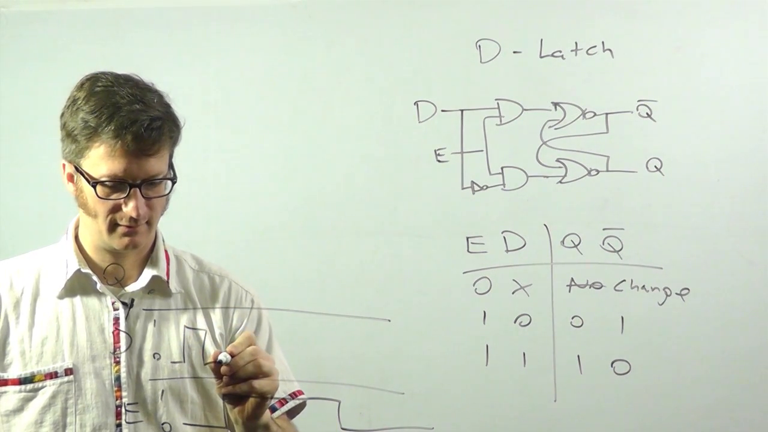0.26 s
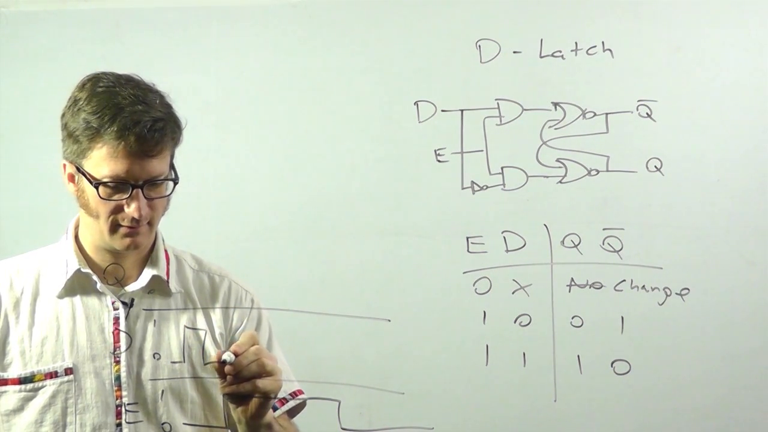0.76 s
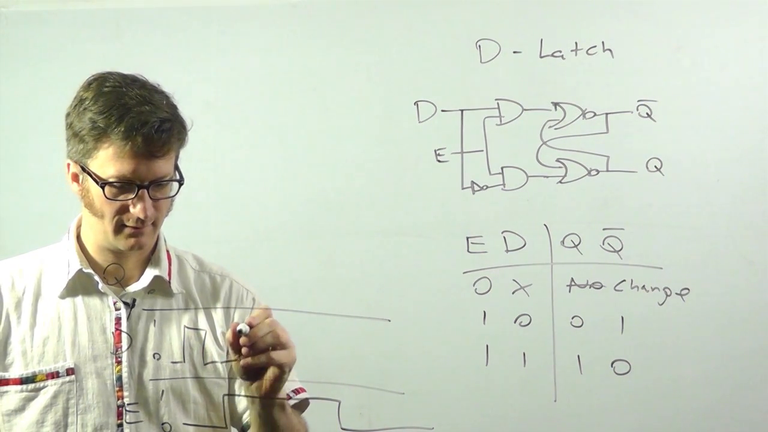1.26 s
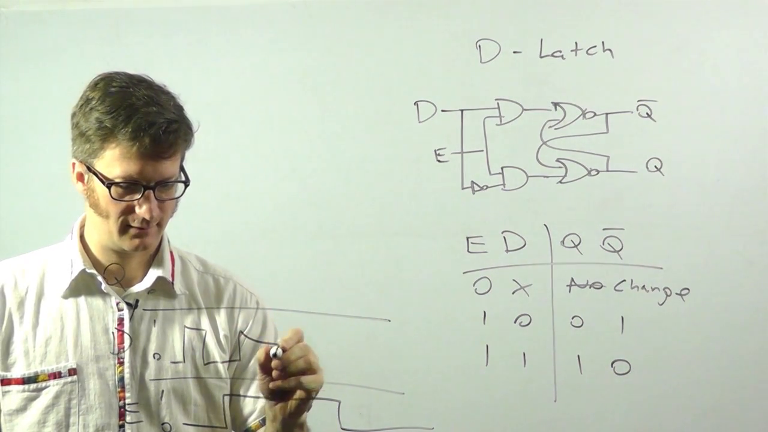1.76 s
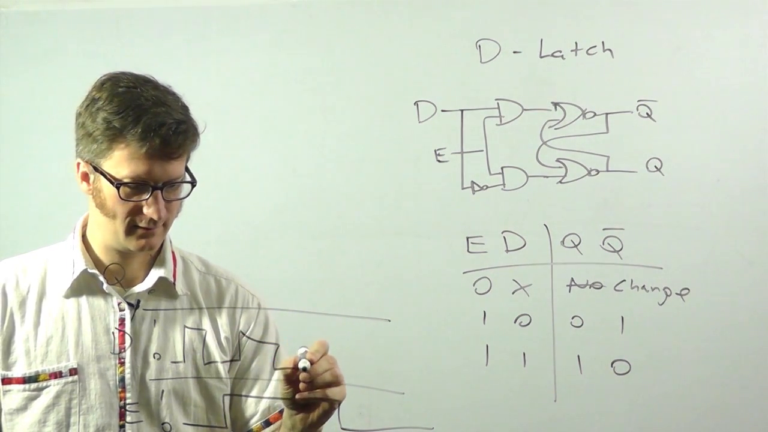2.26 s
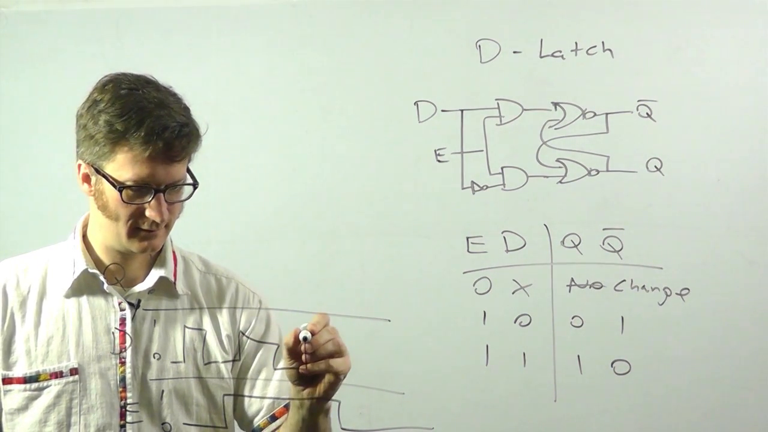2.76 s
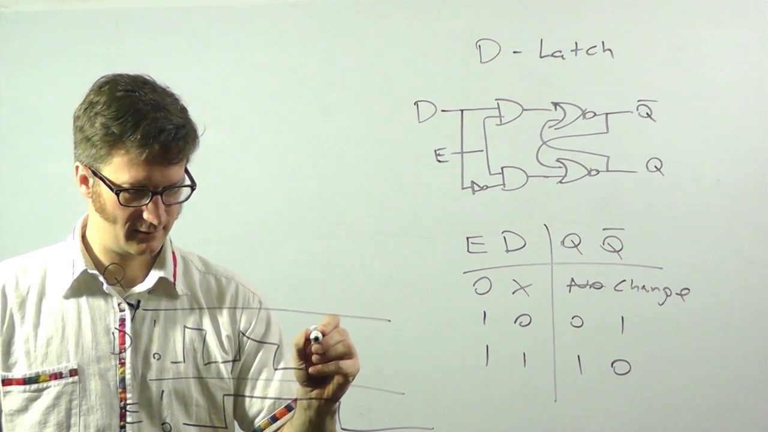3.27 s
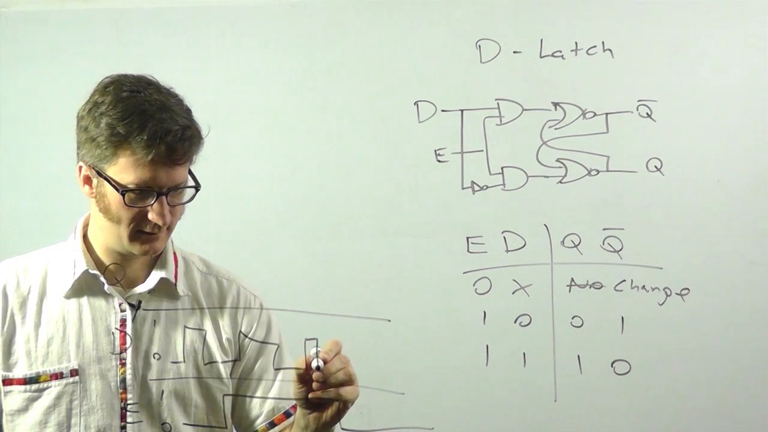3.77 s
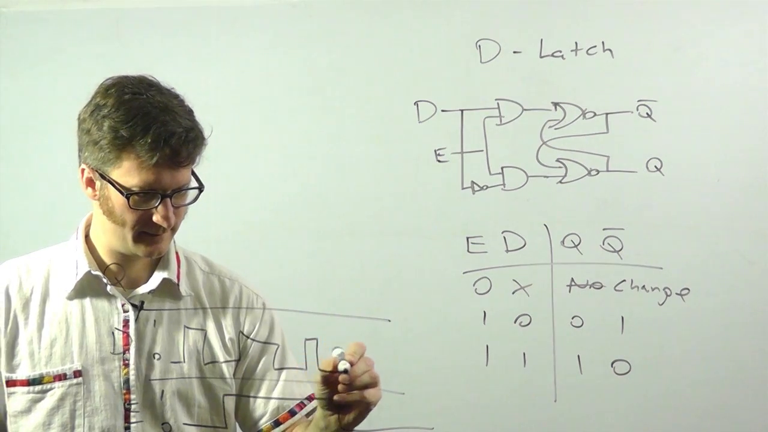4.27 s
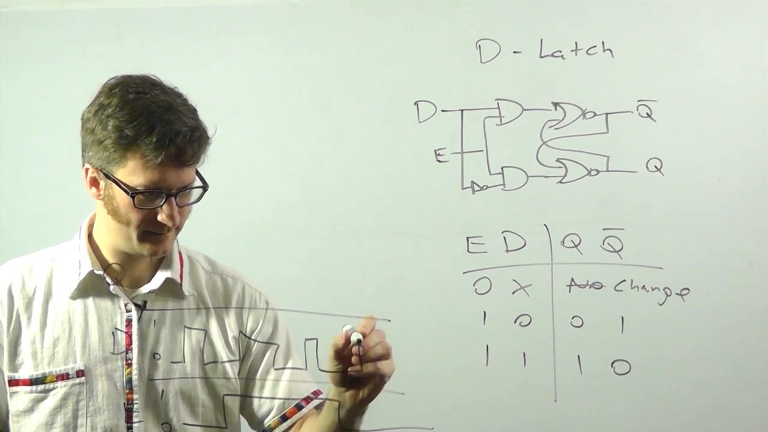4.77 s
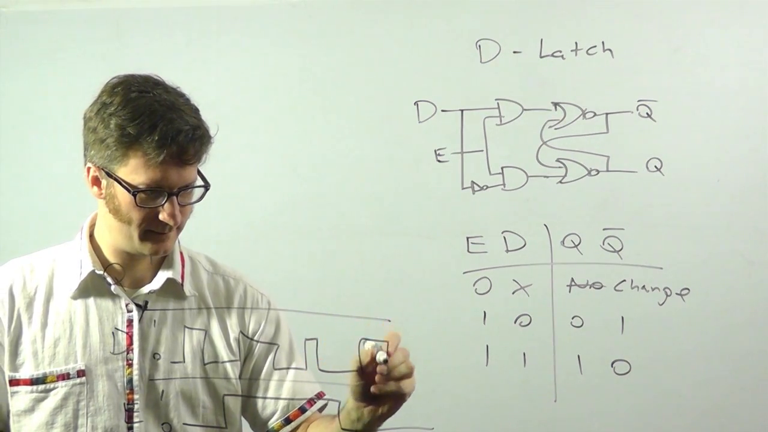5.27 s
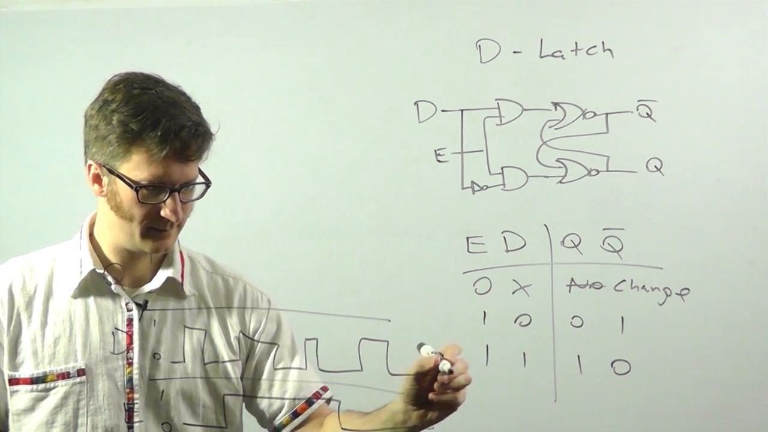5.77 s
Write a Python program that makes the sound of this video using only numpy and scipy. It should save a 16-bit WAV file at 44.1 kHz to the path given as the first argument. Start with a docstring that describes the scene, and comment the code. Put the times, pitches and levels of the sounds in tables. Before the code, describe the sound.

A felt-tip marker squeaks and chirps in short irregular strokes on a smooth hard board, with faint hiss between, in a quiet small room.

```python
"""A felt marker squeaks as it draws a square wave on a glass board: at the corners its tip sticks and slips.
Slow slips are pulses that ring the modes of the pen (chatter); fast ones are gliding tones (whistles).
Snaps of noise mark the stuck tip breaking loose, scraping noise follows the squeaks, and the runs hiss faintly.
Underneath are shaped noise for rumble and microphone hiss, and a low hum; a sleeve rustles as the arm drops.
Decaying noise tails add the echoes of the board and the room."""
import sys
import numpy as np
from scipy import signal
from scipy.fft import rfft, irfft, next_fast_len
from scipy.io import wavfile
from scipy.ndimage import uniform_filter1d

SR = 44100
rng = np.random.default_rng(int(sys.argv[2]) if len(sys.argv) > 2 else 0)


def output_pcm(signal):
    """Save a mono or channel-first signal as 16-bit PCM at the path in sys.argv[1].

    Samples are clipped to [-1, 1] before scaling.
    """
    pcm = np.clip(np.atleast_2d(signal).T, -1, 1) * 32767
    wavfile.write(sys.argv[1], SR, np.round(pcm).astype(np.int16))


N = 264732  # length in samples


def amp(db):
    """Turn dB into a gain."""
    return 10 ** (np.asarray(db) / 20)


def unit(x):
    """Scale x to an rms of 1."""
    return x / np.sqrt(np.mean(x ** 2) + 1e-20)


def along(points, hz):
    """Read a curve of (f/Hz, value) points on a log frequency axis."""
    f, v = np.transpose(points)
    return np.interp(np.log(hz + 1), np.log(f + 1), v)


def track(rows, left=None):
    """Read every column of a time table at each sample of the scene."""
    s, *cols = np.transpose(rows)
    return [np.interp(np.arange(N) / SR, s, c, left=left) for c in cols]


def filtered(x, response):
    """Filter x by a frequency response, with silence added so the ringing does not wrap around."""
    m = next_fast_len(N + SR // 2)
    return irfft(rfft(x, m) * response(np.fft.rfftfreq(m, 1 / SR)), m)[..., :N]


def ringing(modes):
    """Response of damped resonances (f/Hz, width/Hz, level/dB), added with alternating signs."""
    def response(f):
        total = 0
        for k, (c, w, db) in enumerate(modes):
            total = total + (-1) ** k * amp(db) * 1j * f * w / (c * c - f * f + 1j * f * w)
        return total
    return response


def smooth_noise(size, count=N):
    """Noise averaged over `size` points so that it wanders slowly, at rms 1."""
    return unit(uniform_filter1d(rng.standard_normal(count), size=size))


def narrow_noise(centre_hz, width_hz):
    """A band of noise with a movable centre: slow noise multiplied by a sine and a cosine."""
    slow = filtered(rng.standard_normal((2, N)), lambda hz: 1 / (1 + (hz / width_hz) ** 2))
    phase = 2 * np.pi * np.cumsum(centre_hz) / SR
    return unit(slow[0] * np.cos(phase) + slow[1] * np.sin(phase))


# low hum of the room: f/Hz, width/Hz, level/dB
ROOM_HUM = (84, 20, -77.5)


def room_hum():
    """A narrow band of low noise, heard as a faint unsteady hum."""
    hz, width_hz, db = ROOM_HUM
    return amp(db) * narrow_noise(np.full(N, hz), width_hz)


# colour of the rumble and hiss in the centre: f/Hz, relative level/dB
CENTRE_COLOUR = [(12, -33), (20, 0.5), (59, 0), (90, -2.5), (333, -12), (372, -12.5), (1130, -19),
                 (1450, -21.5), (2090, -22), (5530, -24.5), (12800, -25), (15500, -35.5)]
# colour of the rumble and hiss at the sides: f/Hz, relative level/dB
SIDE_COLOUR = [(12, -32), (20, 6), (33, -5.5), (631, -13), (985, -15), (12400, -17), (15500, -17)]


def air():
    """Ventilation rumble and microphone hiss: shaped noise, mostly in the centre."""
    centre, side = (unit(filtered(rng.standard_normal(N), lambda hz: amp(along(colour, hz))))
                    for colour in (CENTRE_COLOUR, SIDE_COLOUR))
    return amp(-62) * centre + amp(-66.5) * side * [[1], [-1]]


# how long the room rings: f/Hz, time to fall by 60 dB t/s
ROOM_DECAY = [(500, 0.32), (3000, 0.15), (12000, 0.1)]
# how long the quick echoes off the board and the writer ring: f/Hz, time to fall by 60 dB t/s
BOARD_DECAY = [(500, 0.22), (3000, 0.083), (12000, 0.065)]


def echoes(x, decay):
    """Convolve x with two noise tails in which each frequency dies at its own speed."""
    hz, t, z = signal.stft(rng.standard_normal((2, SR // 2)), SR, nperseg=128)
    fading = z * amp(-60 * t / along(decay, hz)[:, None])
    tail = signal.istft(fading, SR, nperseg=128)[1]
    delayed = np.pad(x, (130, 0))  # samples
    return signal.fftconvolve(delayed[None], tail / np.linalg.norm(tail[0]), axes=1)[:, :N]


# rustle as the arm drops: t/s, level/dB before its graininess
ARM_DROP = [(5.75, -83), (5.88, -66), (5.93, -63), (6.01, -63)]
# colour of the cloth noise: f/Hz, relative level/dB
CLOTH_COLOUR = [(100, -4), (300, 5), (600, -3.5), (1200, -7.5), (2000, -10), (3200, -12), (4500, -22),
                (16000, -60)]


def sleeve():
    """Soft cloth rubbing: shaped noise, uneven in grains."""
    db, = track(ARM_DROP, left=-120)
    grain_db = 2 * smooth_noise(300)
    cloth = unit(filtered(rng.standard_normal(N), lambda hz: amp(along(CLOTH_COLOUR, hz))))
    return amp(db + grain_db) * cloth


# felt gliding: t/s, hiss level/dB before its patchiness, barrel level/dB re hiss,
# edge level/dB re hiss, edge f/Hz
GLIDE_LEVELS = [(0.0, -80, 5, -8, 7460), (0.6, -102, -6, -5, 8500), (0.93, -76.5, -6, -6, 9200),
                (1.25, -79, 2.5, 1, 7420), (1.55, -73.5, -1.5, -4, 7550), (1.9, -83, 0, -6, 7400),
                (2.55, -74, -3, -3, 7760), (2.95, -85, -5, -2, 7830), (3.24, -71.5, 4, 10, 8820),
                (3.36, -86, -10, -15, 8400), (3.5, -75, -1, -3, 7490), (3.85, -86, -1, -2, 7730),
                (4.18, -79, -3, 0, 7990), (4.32, -81, -1, 3, 8800), (4.6, -83, 1, 5, 8800),
                (4.75, -74, -4, -6, 7400), (4.89, -79, -4, -6, 7600), (4.92, -70, -4, -10, 8000),
                (4.96, -76, -3, -2, 8700), (5.15, -80.5, 8, 7, 9050), (5.42, -77, -0.5, -15, 7540),
                (5.55, -75.5, 5, 4, 8970), (5.75, -88, 2, 4, 9300), (6.0, -95, -6, -3, 9000)]
# centre of the nib band of the hiss, which sags once in a fast stroke: t/s, f/Hz
NIB_PITCH = [(4.68, 5290), (4.9, 4570), (4.97, 5300)]


def glide():
    """Smooth felt on glass: faint noise in the modes of the pen; the edge mode moves with the grip."""
    hiss_db, barrel_db, edge_db, edge_hz = track(GLIDE_LEVELS)
    nib_hz, = track(NIB_PITCH)
    patchy_db = 2 * smooth_noise(1500)
    nib = narrow_noise(nib_hz, 330)
    body = unit(filtered(rng.standard_normal(N), ringing([(1370, 260, -2.0), (4100, 380, -6.0)])))
    edge = narrow_noise(edge_hz, 440)
    return amp(hiss_db + patchy_db) * (nib + amp(barrel_db) * body + amp(edge_db) * edge)


def stroke(rows):
    """Sample numbers of one squeak and its columns at each sample."""
    s, *cols = np.transpose(rows)
    n = np.arange(round(s.min() * SR), round(s.max() * SR))
    return n, [np.interp(n / SR, np.sort(s), c) for c in cols]


# what each slip rate brings out of the pen: slip rate f/Hz, then level/dB of the
# low barrel mode, upper barrel modes, cap and edge
RATE_FAVOURS = [(600, 17.5, -3, 4, -3.5), (930, 10.5, -6, -3.5, -2.5), (1085, 7, 1, -4, 1),
                (1136, -7.5, 3, 6, -3), (1240, -13.5, -0.5, -0.5, -2.5), (1342, 4, 2.5, -6.5, -1),
                (1470, -0.5, 4.5, -0.5, 2), (1430, -29, 6, -2, 5.5), (1850, -6, 6, -10.5, 4.5),
                (2400, 13, -4, -2, 9), (3700, -15, -11, -12, -6)]
# share [0-1] of a level dip that these parts do not follow: low barrel, upper barrel, cap, edge
DIP_IGNORED = (0.49, 0.38, 0.65, 0.27)
ROUGHER_BELOW_HZ, ROUGH_PER_OCTAVE = 1180, 0.36  # roughness added per octave below this slip rate
START_ROUGH, SETTLE_S = 0.21, 0.0091  # extra roughness as a squeak starts, and its time constant
ATTACK_DB, ATTACK_S = 5, 0.0011  # a squeak starts this much down and swells in
RELEASE_DB, RELEASE_S = 4.5, 0.0023  # and fades this much over its last slips


def contact(rows, grip):
    """Sliding contact in one squeak: sample numbers, slip rate, level, roughness and levels of the pen parts."""
    n, (hz, db) = stroke(rows)
    rough, barrel_db, cap_db, edge_db = grip
    age = (n - n[0]) / SR
    dip_db = db.max() - db
    rough = rough + ROUGH_PER_OCTAVE * np.maximum(0, np.log2(ROUGHER_BELOW_HZ / hz))
    rough = rough + START_ROUGH * np.exp(-age / SETTLE_S)
    rates, *favours = np.transpose(RATE_FAVOURS)
    held_db = (barrel_db, barrel_db, cap_db, edge_db)
    parts_db = [part_db + along(np.transpose([rates, more_db]), hz) + share * dip_db
                for part_db, more_db, share in zip(held_db, favours, DIP_IGNORED)]
    db = db - ATTACK_DB * np.exp(-age / ATTACK_S) - RELEASE_DB * np.exp(-age[::-1] / RELEASE_S)
    return n, [hz, db, rough] + parts_db


def grit():
    """Rough or fast contact also scrapes: noise that follows the level of each squeak."""
    gain = np.zeros(N)
    for rows, grip in zip(CHATTER_CURVES, GRIPS):
        n, (hz, db, rough, *_) = contact(rows, grip)
        gain[n] = amp(db - 5.5) * (.05 + np.clip(rough, 0, 1) + (hz / 5500) ** 2)
    for rows in WHISTLE_CURVES:
        n, (hz, db) = stroke(rows)
        gain[n] += amp(-60 + 0.45 * (db + 31))
    scrape = filtered(rng.standard_normal(N), ringing([(5340, 3700, 4.0), (10200, 18000, -3.5)]))
    return gain * unit(scrape)


# the stuck tip breaks loose: t/s, snap level/dB before the pen rings, barrel and cap level/dB re snap
# before their common boost, knock level/dB re snap before its mode
BREAK_EVENTS = [(0.3498, -41.5, -1, -19.5), (0.7947, -26.5, -18.5, -32), (1.1529, -27, -10.5, -27.5),
                (1.4337, -25.5, -12, -46), (1.7629, -31, -14, -29), (2.464, -36, -30, -29.5),
                (3.3797, -33.5, -14, -29.5), (3.939, -36.5, -12, -33), (4.0617, -30.5, -10.5, -43),
                (4.6517, -31.5, -15, -50), (5.215, -41, -15, -34)]
# modes of the pen's barrel: f/Hz, width/Hz, relative level/dB
BARREL_MODES = [(694, 460, -1.5), (1358, 243, 5), (1450, 15, -1.5)]
# mode of the cap end: f/Hz, width/Hz, relative level/dB
CAP_MODES = [(2395, 224, 4)]
# modes of the nib: f/Hz, width/Hz, relative level/dB
NIB_MODES = [(3800, 870, -6.5), (5236, 540, 4)]
# modes of the tip's edge: f/Hz, width/Hz, relative level/dB
EDGE_MODES = [(7760, 1000, 4), (10020, 2300, 3), (11620, 1170, -12), (12800, 920, -6.5)]


def breaks():
    """A sharp snap and a few milliseconds of scraping excite the whole pen; the board gives a dull knock."""
    sharp, deep, knock = np.zeros((3, N))
    t = np.arange(600) / SR
    for s, db, barrel_db, knock_db in BREAK_EVENTS:
        start = round(s * SR)
        snap = amp(db - 60 * t / .028) * rng.standard_normal(len(t))
        snap[0] = 3.5 * amp(db)  # the first jolt
        sharp[start:][:len(t)] += snap
        deep[start:][:len(t)] += amp(barrel_db) * snap
        knock[start] = amp(db + knock_db)
    crack = amp(-2.5) * filtered(sharp, ringing(NIB_MODES)) + amp(-14) * filtered(sharp, ringing(EDGE_MODES))
    body = amp(6.5) * filtered(deep, ringing(BARREL_MODES + CAP_MODES))
    return crack + body + filtered(knock, ringing([(345, 540, 43)]))


# whistles of the tip, one curve each: t/s, pitch f/Hz, level/dB before its flutter
WHISTLE_CURVES = [
    [(0.047, 7000, -61), (0.054, 6760, -55)],
    [(1.083, 8100, -63), (1.093, 7260, -48.5)],
    [(1.156, 6900, -51), (1.17, 7030, -62), (1.181, 7180, -57), (1.21, 7100, -73)],
    [(1.324, 7620, -54), (1.334, 7410, -41), (1.354, 7340, -42), (1.364, 7080, -38), (1.368, 7000, -45),
     (1.3725, 6600, -40)],
    [(1.3725, 5600, -38), (1.376, 5340, -34), (1.38, 5000, -41)],
    [(1.784, 6970, -43), (1.792, 7200, -50), (1.8, 7390, -41.5), (1.817, 7700, -41), (1.821, 7560, -59),
     (1.885, 7700, -75)],
    [(1.94, 7470, -70), (1.96, 7160, -62), (1.969, 7150, -49), (1.997, 6800, -53)],
    [(2.666, 7600, -60), (2.677, 7430, -41), (2.688, 7140, -45), (2.698, 7170, -45), (2.704, 6620, -45)],
    [(3.177, 9330, -63), (3.184, 8500, -41), (3.19, 8460, -37)],
    [(3.417, 7230, -58), (3.424, 7130, -51), (3.434, 7360, -44.5), (3.438, 7340, -58), (3.442, 7380, -42),
     (3.447, 7290, -55), (3.47, 7250, -70)],
    [(4.524, 8060, -46), (4.531, 7610, -52)],
    [(4.5295, 5350, -69), (4.533, 5334, -39)],
    [(4.859, 7500, -48), (4.864, 7550, -40), (4.88, 7460, -36.5), (4.886, 7360, -48), (4.89, 7260, -40),
     (4.895, 7340, -44), (4.898, 7240, -41.5), (4.915, 6800, -58), (4.928, 7970, -35.5), (4.94, 8650, -29),
     (4.946, 9000, -39.5)],
    [(5.24, 6970, -52), (5.25, 7110, -51), (5.257, 7380, -60), (5.275, 7270, -58)],
]
# extra strength of the octave in each whistle, in the same order: level/dB
WHISTLE_OCTAVES = [-20, -25, -10, 3.5, 3.5, 1, -6, 4.5, 0, -3, -20, -8, 1, 0]
# octave level at each pitch, running out near the 16 kHz band limit: pitch f/Hz, level/dB re the pitch
# before the extra strength above
OCTAVE_CURVE = [(5300, -11), (6800, 1.5), (7300, -5.5), (7600, -13), (7950, -56), (8600, -75)]


def whistles():
    """Fast slips lock to the tip: a tone with its octave; the fainter it is, the more it flutters."""
    out = np.zeros(N)
    flutter, waver = (unit(uniform_filter1d(smooth_noise(110), size=110)) for _ in range(2))
    roughness = smooth_noise(5)
    for rows, overtone_db in zip(WHISTLE_CURVES, WHISTLE_OCTAVES):
        n, (hz, db) = stroke(rows)
        octave_db = overtone_db + along(OCTAVE_CURVE, hz)
        loose = np.clip((-36 - db) / 20, .15, 1)
        phase = 2 * np.pi * np.cumsum(hz) / SR
        phase = phase + 0.3 * loose * waver[n] + 0.01 * roughness[n]  # radians
        fade = np.minimum(1, np.minimum((n - n[0]) / 30, (n[-1] - n) / 45))  # in and out, samples
        tone = np.sin(phase) + amp(octave_db) * np.sin(2 * phase)
        out[n] += np.sqrt(2) * fade * amp(db + 2.6 * loose * flutter[n]) * tone
    return out


def pulses(at, strength):
    """Band-limited clicks that may fall between samples."""
    n = np.floor(at)[:, None] + np.arange(-7, 9)
    gap = n - at[:, None]
    shape = np.sinc(gap) * np.cos(np.pi * gap / 16) ** 2
    return np.bincount(n.astype(int).ravel(), (shape * strength[:, None]).ravel(), N)[:N]


def train_rms(modes, hz, rough):
    """Rms of unit slips through the modes: harmonics when regular, plain energy when rough."""
    lines = np.outer(hz, np.arange(1, 30))
    line_power = abs(ringing(modes)(lines)) ** 2 * (lines < SR / 2)
    tonal = 2 * (hz / SR) ** 2 * np.sum(line_power, axis=1)
    spread = hz / SR * np.mean(abs(ringing(modes)(np.linspace(0, SR / 2, 500))) ** 2)
    return np.sqrt((1 - rough) * tonal + rough * spread)


# chatter, one curve per squeak: t/s, slip rate f/Hz, level/dB before swell, fade and random drift
CHATTER_CURVES = [
    [(0.055, 1308, -43.5), (0.066, 1204, -45), (0.069, 1030, -47), (0.071, 546, -48.5), (0.076, 717, -43.5),
     (0.079, 600, -55)],
    [(0.35, 1296, -42), (0.357, 1261, -44.5), (0.381, 1290, -47.5), (0.4, 1400, -46.5), (0.411, 1413, -49),
     (0.43, 1302, -47), (0.445, 1262, -44.5), (0.452, 1026, -49)],
    [(0.796, 1680, -61), (0.803, 1750, -52), (0.811, 1832, -44.5), (0.822, 1850, -45.5), (0.833, 1926, -52)],
    [(1.095, 1240, -42), (1.102, 1090, -50)],
    [(1.38, 3680, -34), (1.388, 3400, -51)],
    [(1.3885, 2440, -38), (1.394, 1700, -34.5)],
    [(1.74, 1156, -41), (1.744, 1203, -40), (1.749, 855, -58), (1.757, 570, -61)],
    [(1.7635, 1470, -55), (1.771, 1398, -46.5), (1.78, 1482, -50), (1.784, 1360, -46.5)],
    [(1.993, 1340, -60), (1.997, 1340, -52), (2.0, 1327, -44), (2.006, 1302, -39), (2.02, 1207, -44.5),
     (2.033, 1136, -44), (2.041, 1146, -53), (2.052, 1253, -39), (2.069, 1350, -42), (2.074, 1390, -54)],
    [(2.345, 1774, -78), (2.356, 1735, -64), (2.361, 1726, -42), (2.3725, 1716, -50)],
    [(2.373, 1306, -39), (2.38, 1306, -42), (2.412, 1279, -42.5), (2.428, 1206, -45), (2.433, 883, -45),
     (2.439, 802, -50)],
    [(2.464, 1312, -35.5), (2.467, 1350, -39)],
    [(2.467, 4020, -39), (2.471, 4030, -44), (2.478, 3900, -70)],
    [(2.479, 3480, -46.5), (2.484, 3682, -40.5), (2.49, 3938, -50), (2.5, 3548, -81)],
    [(2.704, 3700, -41.5), (2.713, 3550, -39), (2.715, 3500, -50), (2.7195, 3380, -35)],
    [(2.72, 1152, -41), (2.736, 1149, -36), (2.742, 894, -44), (2.744, 776, -53), (2.752, 506, -51)],
    [(3.006, 1263, -39), (3.013, 1092, -45.5), (3.02, 1090, -49), (3.028, 1240, -42), (3.04, 1298, -36.5),
     (3.064, 1313, -38.5), (3.086, 1341, -36.5), (3.09, 1370, -49)],
    [(3.19, 1753, -32), (3.196, 1742, -36), (3.216, 1720, -33.5), (3.229, 1633, -37)],
    [(3.23, 1278, -40), (3.237, 1120, -42), (3.239, 910, -40.5), (3.244, 903, -48)],
    [(3.38, 1461, -46.5), (3.392, 1260, -40), (3.399, 1350, -42), (3.404, 1464, -56), (3.414, 1470, -45)],
    [(3.717, 1310, -40), (3.727, 1276, -50), (3.735, 1188, -46), (3.742, 940, -50)],
    [(3.938, 1296, -51.5), (3.944, 1342, -47), (3.949, 1310, -46)],
    [(4.061, 1353, -63), (4.067, 1304, -43.5), (4.079, 1030, -59), (4.082, 1198, -49), (4.098, 1317, -43.5),
     (4.11, 1328, -41), (4.124, 1396, -46)],
    [(4.533, 1237, -40), (4.541, 1172, -45), (4.547, 804, -50.5), (4.549, 716, -71), (4.555, 767, -75)],
    [(4.651, 1414, -37.5), (4.657, 1393, -46.5)],
    [(5.162, 1290, -38.5), (5.166, 1049, -46.5), (5.17, 874, -47.5), (5.172, 943, -74), (5.18, 984, -62)],
    [(5.215, 1276, -40), (5.221, 1320, -48)],
    [(5.218, 3820, -51), (5.228, 3600, -47.5), (5.238, 3900, -50)],
]
# how the pen is held for each squeak, at its loudest: roughness [0-1] before the additions in contact(),
# then barrel, cap and edge level/dB re nib, before what the slip rate adds
GRIPS = [(0.19, -8, -8, -4), (0.13, -9, -11, -4.5), (0.03, -9, 5.5, -2), (0.32, -9, -12.5, -2),
         (0.1, -16, -10, 3), (0.98, -26, -7, -8.5), (0.12, -6, -8.5, -0.5), (0.18, -4, -8, -1),
         (0.2, -9, -6.5, -2.5), (0.22, -14, -4, -9), (0.06, -13, -13.5, 0), (0.61, -12, -2.5, -12),
         (0.34, -2, -6, -4), (0.02, -10, -4, -1.5), (0, -3, -12, 4), (.1, -14.5, -13, -2.5),
         (.03, -7, -11.5, -1.5), (0, -16, -22, -2), (0.06, -5.5, -7, 7), (0.14, -8.5, -10.5, -7),
         (.03, -8.5, -7, -4), (0.41, -5.5, -0.5, -7), (0.14, -5.5, -8.5, -5), (0.26, -3.5, -12.5, 3.5),
         (0.18, -11, -9.5, -5.5), (0.31, -0.5, -21, 4), (0.22, -14.5, -27, -8), (0.18, -3, -8, -2)]
# upper edge modes: slip rate f/Hz, level/dB re the lowest edge mode, before a common offset
EDGE_BRIGHTNESS = [(700, -4), (1100, -8.5), (1250, -3.5), (1320, -6.5), (1420, -0.5), (1750, -12),
                   (2400, 8), (3700, 4.5)]
LOW_UNDER_DB = 10  # the low barrel mode is set this far under the upper ones
UNEVEN_DB = 1.5  # rms drift of each part of the pen from slip to slip
SLIP_TOP_HZ = 13100  # a slip is not perfectly sharp: its treble rolls off here


def chatter(jitter=.3, scatter_db=3):
    """One pulse per slip rings the pen; rough contact scatters the timing (in slip periods) and size."""
    parts = []
    for rows, grip in zip(CHATTER_CURVES, GRIPS):
        n, cols = contact(rows, grip)
        # a slip each time the accumulated rate passes a whole number
        turns = np.cumsum(cols[0]) / SR
        at = np.interp(np.arange(np.ceil(turns[-1])), turns, n)
        parts.append([at] + [np.interp(at, n, c) for c in cols])
    at, hz, db, rough, low_db, barrel_db, cap_db, edge_db = np.concatenate(parts, axis=1)
    rough = np.clip(rough, 0, 1) ** 2
    chance = rng.standard_normal((len(at), 2))
    at = at + jitter * rough * chance[:, 0] * SR / hz
    db = db + (0.043 + scatter_db * rough) * chance[:, 1]
    pen_parts = [(BARREL_MODES[:1], low_db - LOW_UNDER_DB), (BARREL_MODES[1:], barrel_db),
                 (CAP_MODES, cap_db), (NIB_MODES, 0), (EDGE_MODES[:1], edge_db - 1.5),
                 (EDGE_MODES[1:], edge_db - 5.0 + along(EDGE_BRIGHTNESS, hz))]
    pen = np.zeros(N)
    for modes, part_db in pen_parts:
        drift_db = UNEVEN_DB * smooth_noise(12, len(at))
        strength = amp(db + part_db + drift_db) / train_rms(modes, hz, rough)
        pen += filtered(pulses(at, strength), ringing(modes))

    def colour(f):
        # nib and edge cancel each other between their modes
        notch = 1 - ringing([(6900, 1600, -2)])(f)
        return notch / np.sqrt(1 + (f / SLIP_TOP_HZ) ** 6)
    return filtered(pen, colour)


def scene():
    """Add up the pen, the sleeve, their echoes and the room."""
    def dull(hz):
        # all but the whistles and the sleeve end a little lower in the treble
        return 1 / (1 + (hz / 14600) ** 70)
    sources = filtered(breaks() + glide() + grit() - chatter(), dull) + whistles() + sleeve()
    centre, side = amp(-15.0) * echoes(sources, ROOM_DECAY) + amp(-15.5) * echoes(sources, BOARD_DECAY)
    # the two microphone ports sit close together, so they hear nearly the same echoes
    heard = sources + centre + 0.0057 * side * [[1], [-1]]
    return heard + filtered(air() + room_hum(), dull)


def record(dry):
    """Keep nothing from the band limit of 16 kHz upward."""
    return filtered(dry, lambda hz: hz < 16000)


dry = scene()
out = record(dry)
output_pcm(out)
```